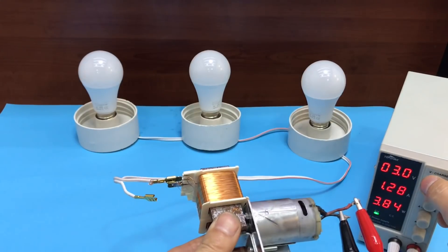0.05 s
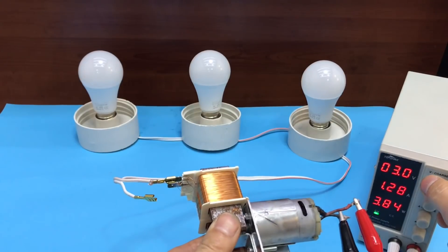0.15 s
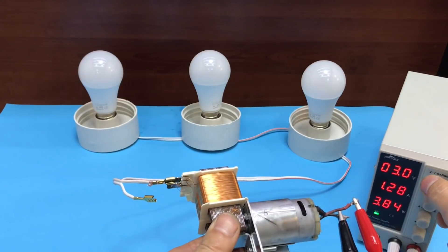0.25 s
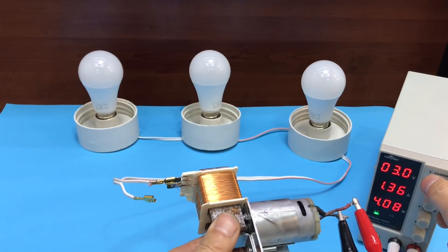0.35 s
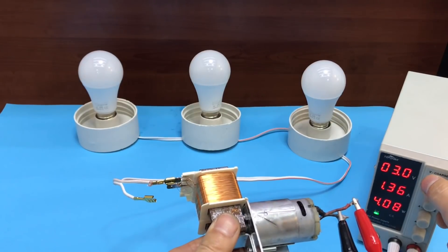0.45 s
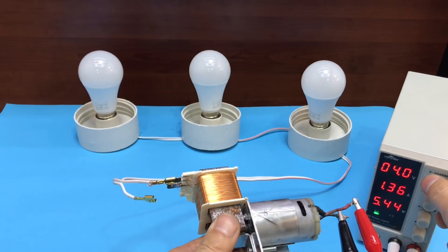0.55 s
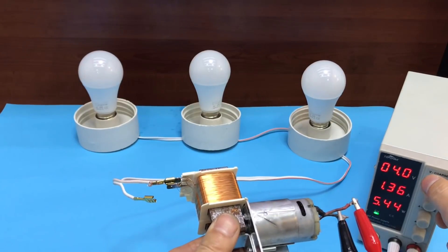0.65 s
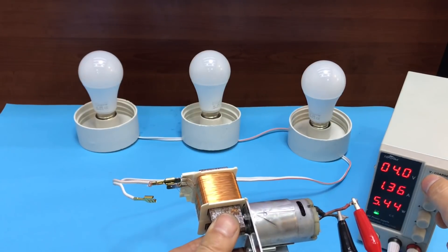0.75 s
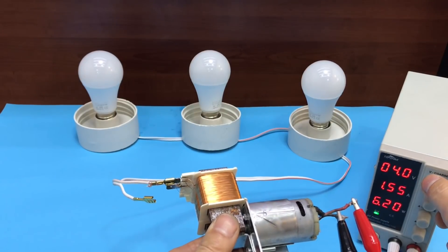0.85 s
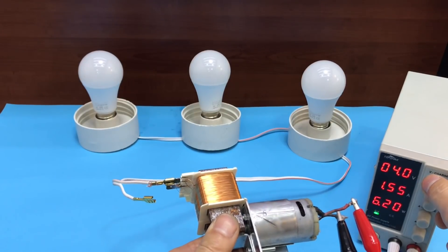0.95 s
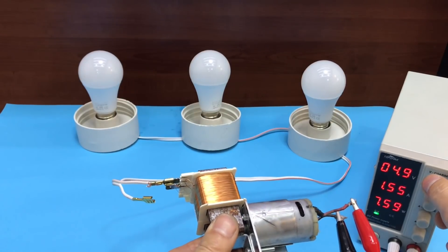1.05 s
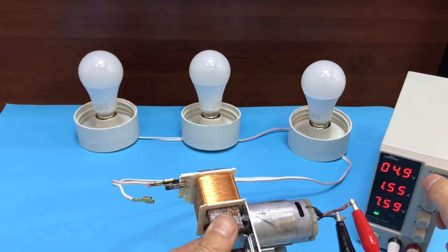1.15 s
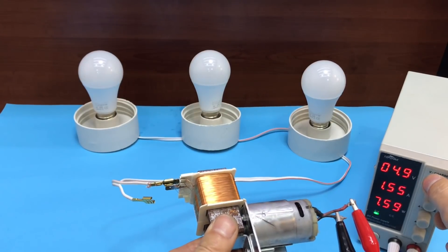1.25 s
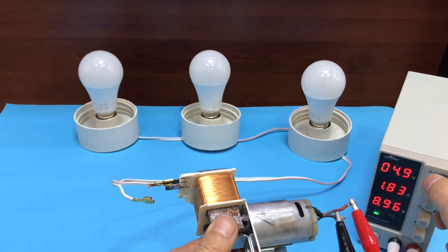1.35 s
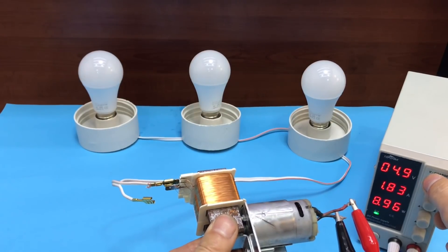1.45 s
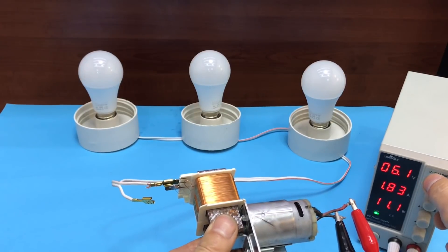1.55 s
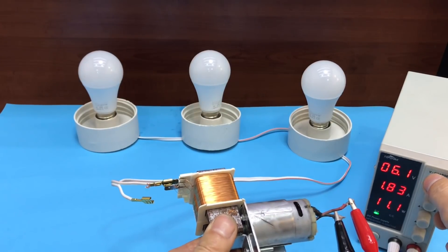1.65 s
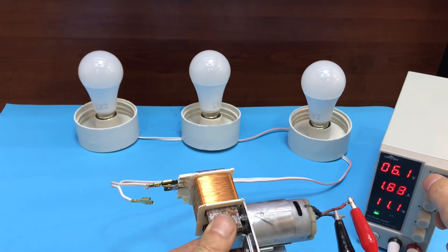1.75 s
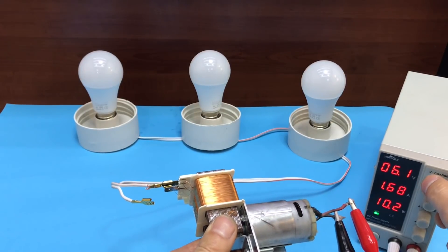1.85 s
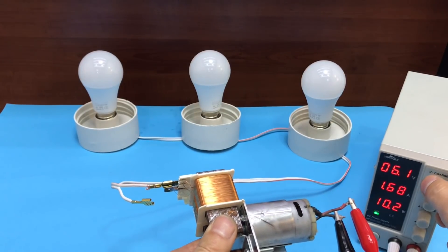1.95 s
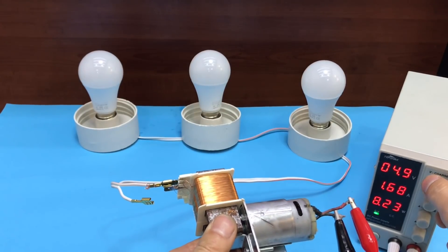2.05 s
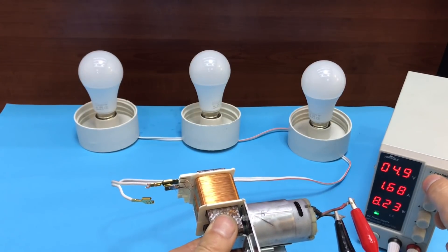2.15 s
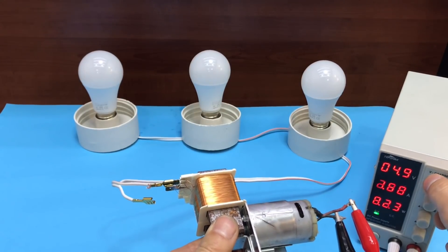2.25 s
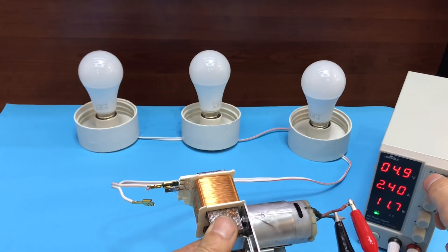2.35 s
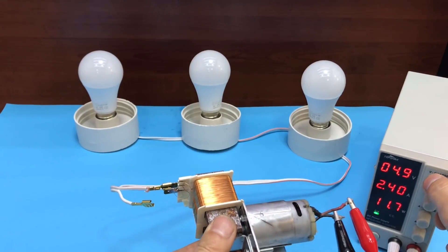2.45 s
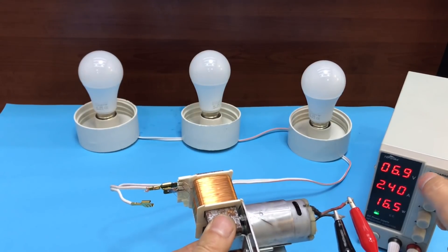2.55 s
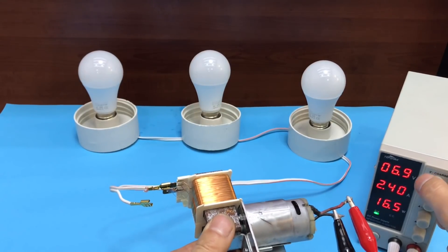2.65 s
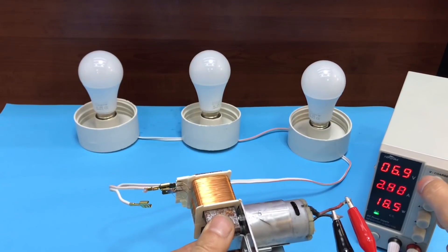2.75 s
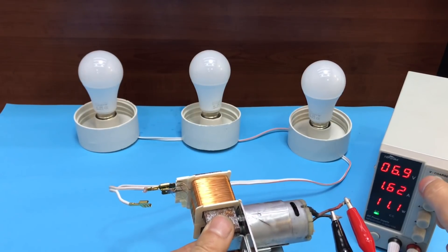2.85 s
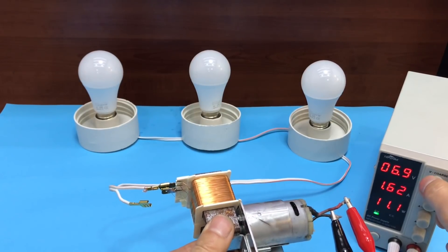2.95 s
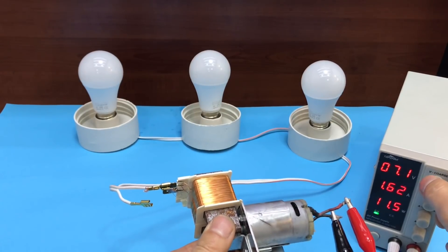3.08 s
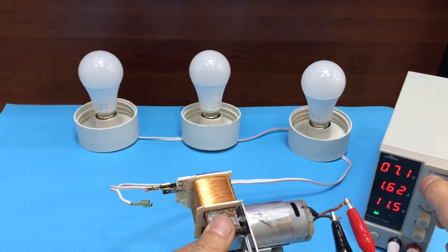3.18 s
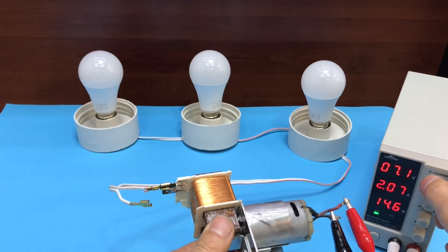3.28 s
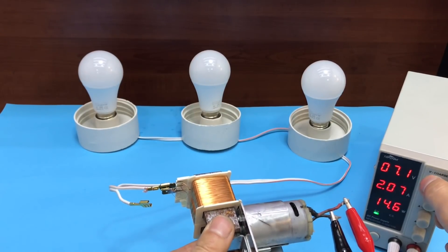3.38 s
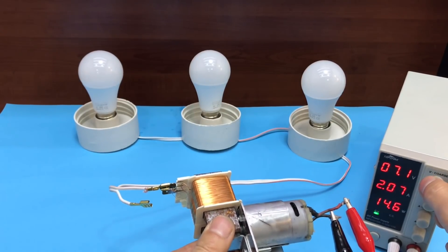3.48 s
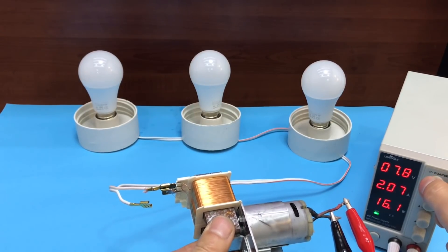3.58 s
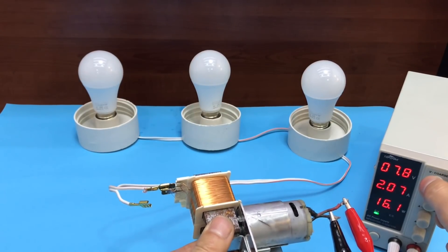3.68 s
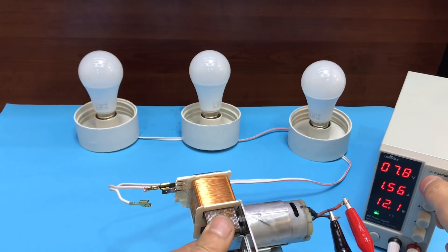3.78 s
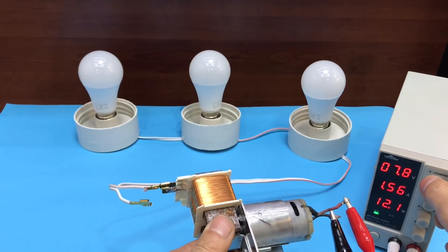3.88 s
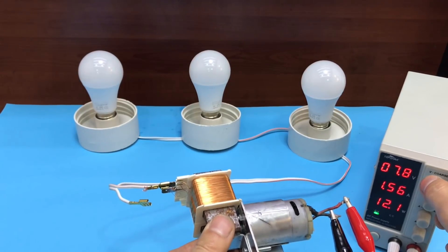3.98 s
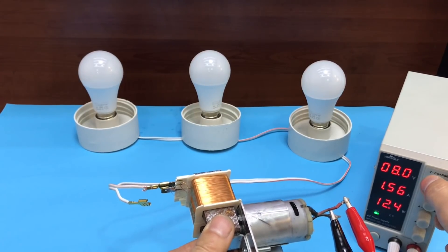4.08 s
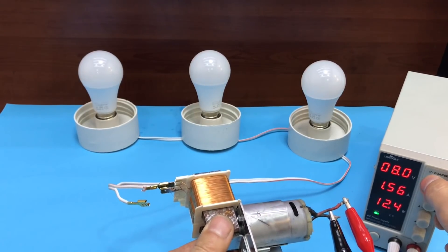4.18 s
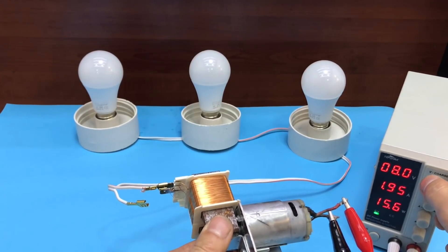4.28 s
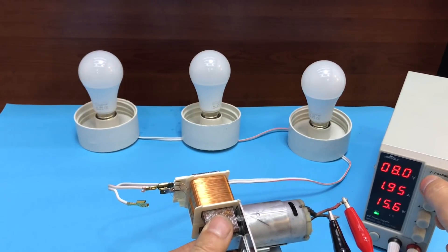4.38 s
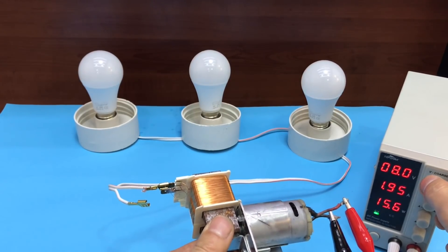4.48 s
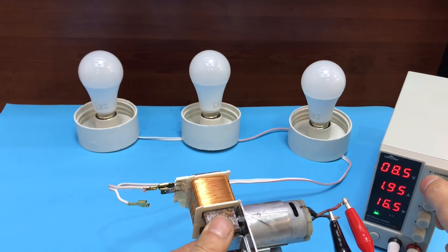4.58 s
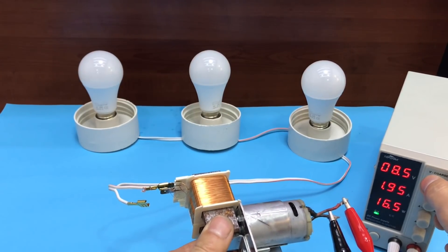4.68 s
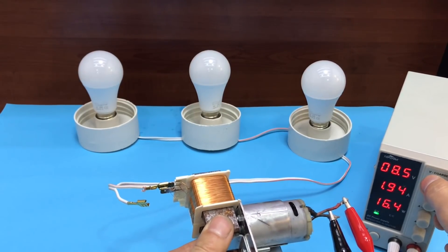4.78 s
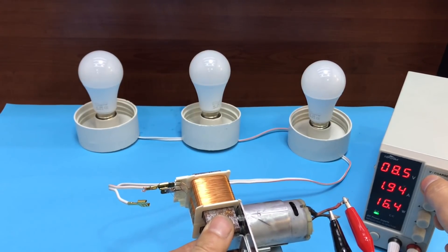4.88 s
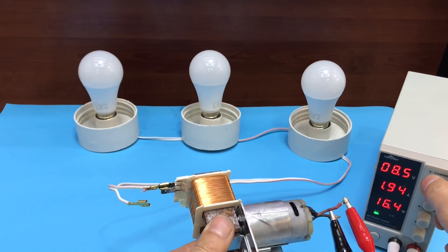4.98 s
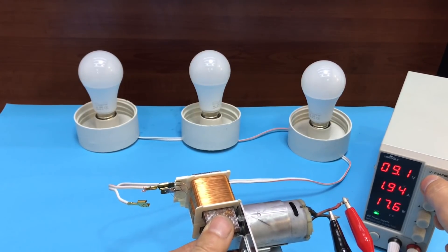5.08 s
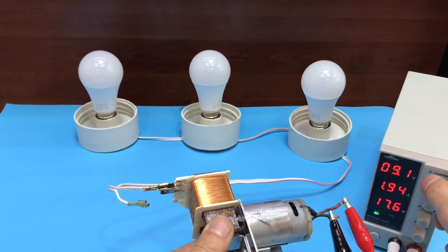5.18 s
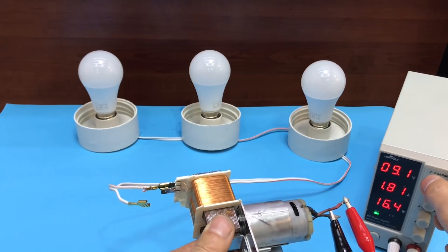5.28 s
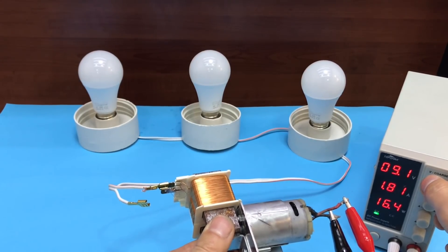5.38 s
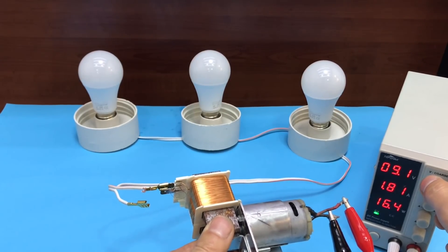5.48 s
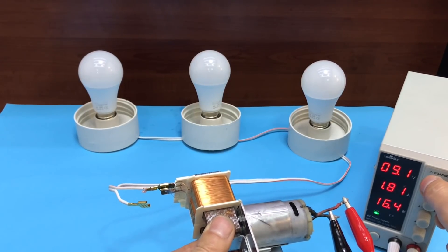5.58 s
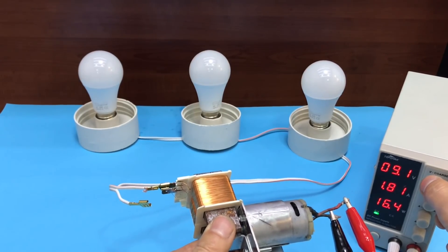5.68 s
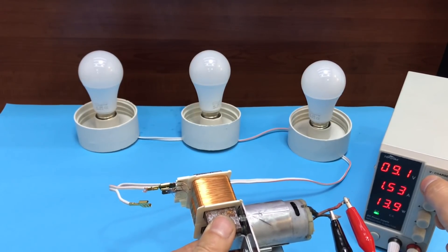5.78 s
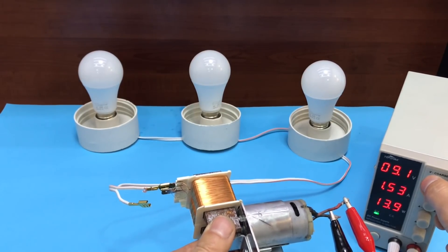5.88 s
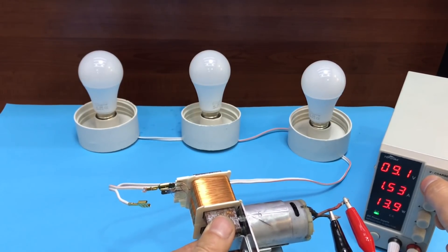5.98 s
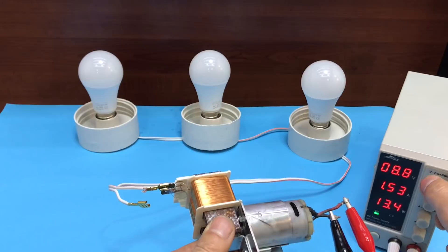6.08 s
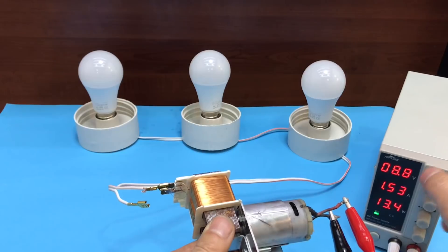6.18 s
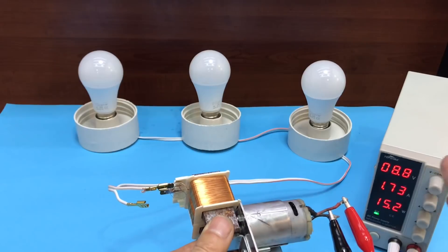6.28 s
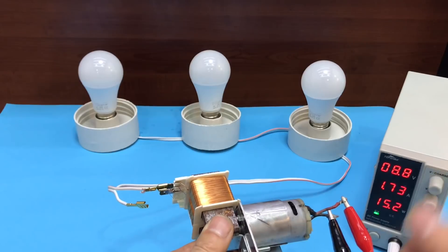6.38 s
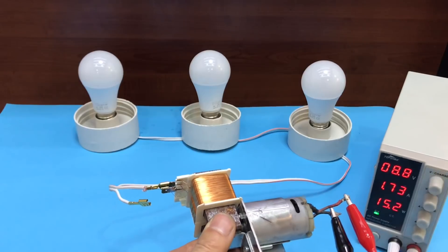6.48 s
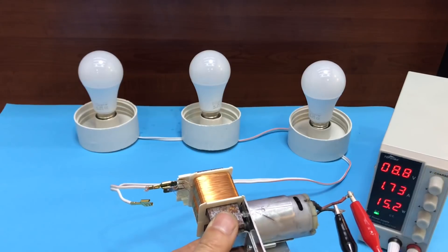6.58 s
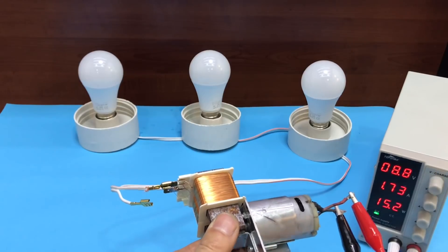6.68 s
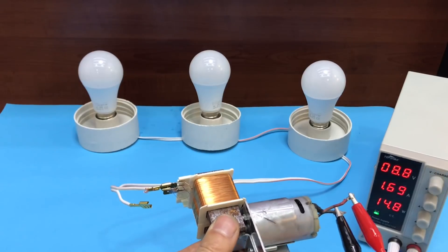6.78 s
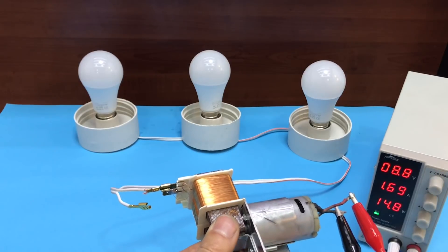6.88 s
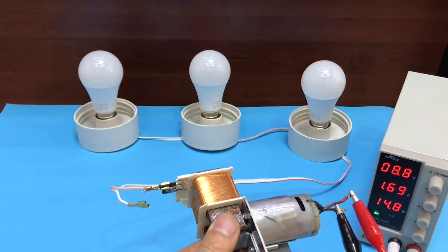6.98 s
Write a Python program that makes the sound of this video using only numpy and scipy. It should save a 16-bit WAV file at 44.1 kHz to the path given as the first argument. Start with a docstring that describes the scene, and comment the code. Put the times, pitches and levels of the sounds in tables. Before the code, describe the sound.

Light metallic rattles, a brief scrape and bursts of sharp knocking come from a spinning magnet as a small electric motor picks up speed. The motor's hissing whine rises in pitch and level, dips, recovers and levels off into a high, even whir. A thin bearing squeal joins toward the end. The sound is close, on a workbench in a quiet room.

```python
"""On a workbench in a quiet room, a small brushed DC motor spins a magnet against a hand-held coil.
Its supply is turned up in steps, so it speeds up, sagging at times under load. The brushes fizz and
the commutator (the spinning contact they press on) whines through the ringing steel can and bracket.
Early on, the magnet knocks, rattles and scrapes. The dry bearing rasps now and then, and near the end
its thin squeal joins the steady whir."""
import sys
import numpy as np
from scipy import signal
from scipy.io import wavfile
from scipy.ndimage import uniform_filter1d

SR = 44100
rng = np.random.default_rng(int(sys.argv[2]) if len(sys.argv) > 2 else 0)


def wav_record(signal):
    """Record a signal, one row per channel, as 16-bit PCM in the file named by sys.argv[1]."""
    frames = np.transpose(np.atleast_2d(signal))
    bounded = np.clip(frames, -1, 1)
    # unit amplitude maps onto the largest positive 16-bit level
    quanta = np.round(bounded * 32767).astype(np.int16)
    wavfile.write(sys.argv[1], SR, quanta)


N = 310023
T = np.arange(N) / SR
HZ = np.fft.rfftfreq(8192, 1 / SR)  # the frequencies at which filter gains are given


def amp(db):
    """Turn decibels into a plain multiplier."""
    return 10 ** (np.asarray(db) / 20)


def unit(x):
    """Scale a signal so that its average (RMS) level is 1."""
    return x / np.sqrt(np.mean(x ** 2) + 1e-20)


def steady(x, window_samples=3000):
    """Hold the level at 1 throughout, leaving fast flutter alone."""
    return x / np.sqrt(abs(uniform_filter1d(x ** 2, window_samples)) + 1e-20)


def curve(points):
    """Join (time_s, value) points with straight lines."""
    return np.interp(T, *np.transpose(points))


def spells(rows, fade_s):
    """One curve per value column of (start_s, end_s, values...) rows, fading to zero between rows."""
    return sum(np.outer(values, np.clip(np.minimum(T - start, end - T) / fade_s + .5, 0, 1))
               for start, end, *values in rows)


def drift(rate_hz):
    """A random wander of size 1 that turns about rate_hz times a second."""
    points = rng.standard_normal(4096)
    return unit(np.interp(T * rate_hz, np.arange(len(points)), points))


def spectrum(points):
    """The gain at every frequency, from (pitch_hz, gain_db) points."""
    hz, db = np.transpose(points)
    return amp(np.interp(np.log(HZ + 1), np.log(hz), db))


def colour(x, gain):
    """Filter with the given gains so that clicks ring after they land, never before."""
    log_gain = np.log(np.maximum(np.r_[gain, gain[-2:0:-1]], 1e-5))
    taps = np.fft.ifft(np.exp(np.conj(signal.hilbert(log_gain)))).real
    return signal.oaconvolve(x, taps[:len(taps) // 2])[:N]


def noise_band(hz, width_hz, steepness=2):
    """Noise in one band around a pitch."""
    gain = 1 / (1 + (2 * (HZ - hz) / width_hz) ** steepness)
    return unit(colour(rng.standard_normal(N), gain))


def once_a_turn(turns, place, length):
    """A burst at one place in each turn that dies away; place and length are parts of a turn."""
    return np.exp(-((turns - place) % 1) / length)


def speed_db(speed_hz, full_db, db_per_doubling, full_at_hz):
    """A level that rises with speed, then holds once it is full."""
    return full_db + db_per_doubling * np.log2(np.minimum(speed_hz / full_at_hz, 1))


def swept_gain(pitch_hz, peaks, steepness=1.47):
    """The strength of a tone as its pitch sweeps through resonances."""
    power = sum(amp(db) ** 2 / (1 + (2 * (pitch_hz - hz) / width) ** 2 / steepness) ** (2 * steepness)
                for hz, width, db in peaks)
    return np.sqrt(power)


def body_gain(bass_cut_hz=430):
    """The motor's body rings and lets sound out of its vents; it is too small to give much bass."""
    # ringing of the can and bracket: pitch_hz, width_hz, gain_db
    resonances = [(443, 14, -25.5), (554, 44.4, -13), (910, 56, -23.5), (1133, 77, -16.5),
                  (1220, 50, -12.5), (1580, 40, -8.5), (1890, 50, -5.5), (2127, 161, -4.5), (2575, 165, -6),
                  (2716, 67, -9), (3070, 16, -2.5), (3370, 170, -12.5), (3896, 55, 3), (3990, 670, -11),
                  (4790, 540, -11.5), (5110, 270, -7.5), (6330, 730, -9), (6980, 49, -5), (8535, 170, -8),
                  (9400, 93, -4.5), (9900, 600, -14.5), (11080, 140, -1.5), (10700, 250, -19),
                  (12038, 180, -33), (13100, 130, -35), (13750, 170, -9), (14620, 90, -1),
                  (15370, 550, -3.5)]
    # sound that leaves the vents directly: pitch_hz, gain_db
    vents = [(100, -20), (330, -40), (700, -25.5), (1400, -20), (2000, -12.5), (4500, -12.5), (5700, -15.5),
             (8000, -14), (10400, -14), (12500, -8), (16000, -12.5)]
    ringing = sum(amp(db) ** 2 / (1 + (2 * (HZ - hz) / width) ** 2) ** 1.61
                  for hz, width, db in resonances)
    return np.sqrt(ringing + spectrum(vents) ** 2) / np.sqrt(1 + (bass_cut_hz / (HZ + 1)) ** 6)


def commutator_bumps(turns, count=36):
    """Worn bumps come round each turn and slowly change: tones from 13 times the shaft speed upward."""
    buzz = np.zeros(N)
    for k in range(count):
        angle = 2 * np.pi * (13 + k) * turns
        tone = np.tanh(drift(5)) * np.cos(angle) + np.tanh(drift(5)) * np.sin(angle)
        buzz += np.sqrt(1 - k / count) * tone
    return unit(buzz)


def brush_hiss(speed_hz, full_at_hz=215):
    """A high band of hiss from the brushes that grows steeply with speed, then holds."""
    return amp(-4) * np.minimum(speed_hz / full_at_hz, 1) ** 4 * noise_band(11550, 1500, steepness=6)


def brushes(turns, speed_hz, sparks_per_s=4200, chatter_depth=0.37):
    """Rubbing, sparks and commutator bumps make the body ring, hardest once a turn."""
    # spells when the brushes ease or bite: start_s, end_s, rub_change_db, fizz_change_db
    grips = [(.93, 1.14, -2, 0), (1.25, 1.57, -1, -1.5), (1.59, 2.0, -0.5, 0), (2.0, 2.19, -3, -6.5),
             (2.19, 2.28, -2, -4), (2.82, 3.18, 1.5, 0.5), (3.19, 3.29, -1.5, -3), (3.32, 3.63, 0.9, .5),
             (3.65, 3.85, -0.3, -1.5), (3.86, 3.95, 2, 3), (3.98, 4.7, -.5, -.5), (6.55, 7.1, -1, -.3)]
    # spells when they ride smoothly, so more of the sound repeats: start_s, end_s, extra_share (0-1)
    smooth_rides = [(.58, 1.24, 0), (2.46, 3.15, 0.3)]
    rub_db, fizz_db = spells(grips, fade_s=.03) + 0.52 * drift(14)
    rub_db += speed_db(speed_hz, full_db=-40.54, db_per_doubling=10.66, full_at_hz=167.8)
    fizz_db += speed_db(speed_hz, full_db=-42.05, db_per_doubling=12.8, full_at_hz=176)
    repeat_share = 0.067 + spells(smooth_rides, fade_s=.12)[0]

    # one strong and one weak burst in every turn
    place = .02 * drift(90) + .1 * drift(3)
    bursts = once_a_turn(turns, place, 0.21) + 0.39 * once_a_turn(turns, place + 0.43, 0.33)
    bursts *= amp(2 * np.tanh(drift(170)))
    chatter = unit(1 - chatter_depth + chatter_depth * bursts / bursts.mean())

    spark_sizes = np.minimum(rng.exponential(1, N), 2) * rng.choice([-1, 1], N)
    sparks = unit(spark_sizes * (rng.random(N) < sparks_per_s / SR))
    friction = np.sqrt(0.5) * (rng.standard_normal(N) + sparks)
    bumps = 0.52 * np.sqrt(repeat_share) * commutator_bumps(turns)
    rubbing = colour(chatter * (np.sqrt(1 - repeat_share) * friction + bumps), body_gain())

    # the treble gets extra flutter and its own level
    treble = signal.sosfiltfilt(signal.butter(6, 10300, "high", fs=SR, output="sos"), rubbing)
    fizz = steady(treble * chatter ** 0.31) + chatter * brush_hiss(speed_hz)
    return amp(rub_db) * steady(rubbing - treble) + amp(fizz_db) * fizz


def shaft_drone(turns, speed_hz, waver_db=3.5):
    """Low shaft tones take turns ringing the body; the off-balance rotor hums below them."""
    # tones that shake the body: times_shaft_speed, relative_db
    shaft_tones = [(4, 3), (5, 0.5), (6, 2), (7, -2), (8, -1), (9, 1.5), (10, -7), (11, -0.5), (13, -16),
                   (14, -2), (15, -4.5), (16, -11)]
    # how well the mount and bench carry them: pitch_hz, gain_db
    mount = [(150, -19), (340, 0), (420, 10.5), (560, 2.5), (700, 1.5), (830, 0), (1000, 2), (1400, 2),
             (2000, 0), (3500, -7.5)]
    # bench resonances, shaken once a turn: pitch_hz, width_hz, level_db
    bench_peaks = [(152, 53, -78.5), (208, 28, -72)]
    angle = 2 * np.pi * turns + 0.072 * drift(40)
    tones = sum(amp(db + waver_db * drift(6)) * np.cos(round(multiple) * angle + 2 * np.pi * rng.random())
                for multiple, db in shaft_tones)
    carried = steady(colour(tones, body_gain() * spectrum(mount)), window_samples=12000)
    hum = swept_gain(speed_hz, bench_peaks) * amp(2.1 * drift(12)) * np.cos(angle)
    level_db = speed_db(speed_hz, full_db=-52.5, db_per_doubling=7.25, full_at_hz=218)
    return amp(level_db) * carried + np.sqrt(2) * hum


def commutator_whine(turns, speed_hz, waver_db=2):
    """The commutator switches twelve times a turn, making a clear tone that follows the speed."""
    # resonances the whine sweeps through: pitch_hz, width_hz, level_db
    whine_peaks = [(1220, 360, -72), (1580, 55, -61), (1936, 79.5, -52), (2078, 73, -48.5),
                   (2192, 102, -41.5), (2396, 570, -54), (2665, 850, -51.5)]
    level = swept_gain(12 * speed_hz, whine_peaks) * amp(waver_db * drift(25))
    return np.sqrt(2) * level * np.cos(12 * 2 * np.pi * turns + 0.18 * drift(60))


def mount_shake(turns, speed_hz, waver_db=0.86):
    """The mount hums as it shakes three times a turn and, weakly, twice a turn."""
    # resonances of the mount: pitch_hz, width_hz, level_db
    mount_peaks = [(288, 130, -80.5), (439, 67, -64), (504, 46, -58), (551.7, 42.2, -49.5),
                   (693, 57, -68.5)]
    angle = 2 * np.pi * turns
    level = swept_gain(3 * speed_hz, mount_peaks) * amp(waver_db * drift(17))
    return np.sqrt(2) * level * (np.cos(3 * angle) + amp(-23) * np.cos(2 * angle))


def bearing_squeal(turns, pulse_depth=0.36):
    """The dry bearing rasps and squeals in narrow bands of noise that pulse with each turn."""
    # swells of friction: start_s, loudest_s, end_s, pitch_hz, width_hz, level_db
    squeals = [(-.1, .08, .16, 7100, 600, -53), (.52, .66, .85, 4500, 900, -54),
               (.95, 1.14, 1.25, 4950, 650, -49), (4.4, 4.9, 5.2, 3900, 70, -46),
               (6.13, 6.16, 6.2, 3900, 70, -44), (6.3, 6.47, 7.3, 3300, 400, -50.5),
               (6.5, 6.62, 6.85, 3900, 70, -45), (6.65, 6.8, 6.97, 4650, 650, -48),
               (6.5, 6.8, 7.5, 6820, 600, -48.5), (6.65, 6.93, 7.4, 12150, 550, -46),
               (6.42, 6.62, 7.5, 15120, 380, -45)]
    pulse = unit(1 + pulse_depth * np.cos(2 * np.pi * turns))
    return pulse * sum(amp(db) * np.interp(T, [start, loudest, end], [0, 1, 0]) * noise_band(hz, width)
                       for start, loudest, end, hz, width, db in squeals)


def room(air_db=-71, hum_fade_s=0.065):
    """Quiet room air, the rumbling bench and faint low hums."""
    # tone colour of the air: pitch_hz, gain_db
    air_colour = [(22, -38), (35, -1.5), (55, 1.5), (80, -7), (110, -3), (200, -8.5), (330, -10.5),
                  (1000, -10.5), (16000, -37.5)]
    # a low hum that comes and goes: start_s, end_s, pitch_hz, level_db
    hum_spells = [(4.399, 5.35, 53.68, -68.5), (5.849, 6.706, 53.56, -69.5)]
    # rumble of the bench, strongest early on while the motor is slow: time_s, level_db
    rumble_levels = [(0, -64), (.4, -66.5), (.55, -72.5), (2.2, -71.5), (2.7, -83), (7.03, -82)]
    air = amp(air_db) * unit(colour(rng.standard_normal(N), spectrum(air_colour)))
    hums = np.zeros(N)
    for start, end, hz, db in hum_spells:
        fade = np.clip(np.minimum(T - start, end - T) / hum_fade_s, 0, 1)
        hums += amp(db) * np.sqrt(2) * fade * np.sin(2 * np.pi * hz * T)
    rumble = amp(curve(rumble_levels)) * noise_band(74, 46)
    constant_hum = amp(-81) * noise_band(146, 11.5)
    return air + hums + rumble + constant_hum


def bracket_ring(blows, crunch_s=0.0022):
    """Each blow rings the bracket and adds a short crunch of loose parts."""
    # notes that a blow rings: pitch_hz, ring_s (time to fall 60 dB), relative_db
    notes = [(1950, .016, -7), (2300, .016, -3), (2620, .018, 0), (5080, .016, -2), (6350, .007, -13),
             (7050, .01, -8), (10900, .007, -10), (14550, .006, -14), (15400, .005, -5)]
    t = np.arange(2048) / SR
    ring = sum(amp(db - 60 * t / ring_s) * np.sin(2 * np.pi * hz * t) for hz, ring_s, db in notes)
    ring = signal.sosfilt(signal.butter(4, 1400, "high", fs=SR, output="sos"), ring)
    crunch_level = signal.lfilter([1], [1, -np.exp(-1 / (crunch_s * SR))], blows)
    crunch = colour(crunch_level * rng.standard_normal(N), unit(body_gain()))
    return signal.oaconvolve(blows, ring / abs(ring).max())[:N] + 0.16 * crunch


def magnet_knocks(turns, speed_hz, bounce_s=.013, spread_db=1.5):
    """The slightly loose magnet knocks and bounces in step with the shaft, and rattles twice a turn."""
    # knocks, each with its run of bounces: start_s, end_s, strength_db
    bounces = [(.013, .135, -44), (.167, .19, -37), (.385, .414, -31), (.53, .556, -34), (.751, .775, -34),
               (1.411, 1.417, -28), (1.594, 1.627, -24), (1.673, 1.693, -24), (1.723, 1.73, -22),
               (1.773, 1.793, -25), (1.817, 1.886, -26), (1.913, 1.931, -23), (1.944, 2.005, -24),
               (2.268, 2.378, -23)]
    # spells of lighter rattling: start_s, end_s, strength_db
    rattles = [(0.13, 0.198, -46.5), (0.217, .375, -44), (0.392, .555, -50), (1.221, 1.997, -55),
               (2.2, 2.47, -54), (2.8, 3.1, -43)]
    # how both carry from the bracket: pitch_hz, gain_db
    knock_colour = [(1000, -4), (1500, -6), (2300, .5), (3200, -2), (5000, 2), (7000, 3), (11000, 1),
                    (15500, 1.5)]
    blows = np.zeros(N)
    for start, end, db in bounces:
        turns_apart = max(1, round(bounce_s * np.interp(start, T, speed_hz)))
        first_turn, last_turn = np.interp([start, end], T, turns)
        hits = np.searchsorted(turns, np.arange(first_turn, last_turn, turns_apart))
        blows[hits] += amp(db + spread_db * rng.standard_normal(len(hits)))

    half_turn = np.floor(2 * turns + 0.052 * drift(80))
    ticks = np.diff(half_turn, prepend=0).clip(0, 1)
    ticks *= np.where(half_turn % 2, .6, 1) * amp(-4 * np.tanh(drift(200)))  # strong, weak, and uneven
    rattle_level = spells([(start, end, amp(db)) for start, end, db in rattles], fade_s=.02)[0]
    sound = colour(bracket_ring(blows) + rattle_level * unit(bracket_ring(ticks)), spectrum(knock_colour))

    # harder bounces at speed ring brighter: taking away the previous sample thins the low notes
    hardness = np.clip(0.42 * np.log2(speed_hz / speed_hz.min()), 0, .9)
    return sound - hardness * np.roll(sound, 1)


def magnet_scrape(turns):
    """For a moment the magnet brushes the coil, with a bright scratch on every turn."""
    # how hard it scrapes: time_s, level_db
    scrape_levels = [(.49, -90), (.52, -48), (.7, -46), (.91, -43.5), (.95, -90)]
    # tone colour of the scrape: pitch_hz, gain_db
    scrape_colour = [(1000, -59), (4000, -24), (8000, -17.5), (11000, -38), (12700, -13), (14300, -14),
                     (15300, -11.5)]
    scratches = once_a_turn(turns, .45 + .01 * drift(100), .17) * rng.standard_normal(N)
    return amp(curve(scrape_levels)) * unit(colour(scratches, body_gain() * spectrum(scrape_colour)))


def scene():
    """One shaft speed drives the motor and the magnet, in a quiet room."""
    # speed of the shaft: time_s, speed_hz (turns a second)
    shaft_speeds = [(0.0, 67.4), (0.23, 75.76), (0.6, 97.6), (0.94, 113.7), (1.33, 140.5), (1.61, 150.6),
                    (1.7, 157.7), (1.84, 160), (1.9, 157.7), (1.96, 147.8), (2.08, 123.8), (2.11, 120.6),
                    (2.15, 123.9), (2.25, 142.8), (2.35, 157.7), (2.41, 164.5), (2.51, 173), (2.96, 174.2),
                    (3.11, 179), (3.39, 197.3), (3.5, 199), (3.72, 182.9), (4.23, 215.8), (4.29, 216.8),
                    (4.7, 218.3), (4.89, 230.7), (5.5, 234.9), (5.7, 219), (5.78, 218.2), (6.03, 224.8),
                    (6.68, 225.2), (7.03, 224.5)]
    speed_hz = curve(shaft_speeds)
    turns = np.cumsum(speed_hz * (1 + .0008 * drift(25))) / SR
    motor = brushes(turns, speed_hz) + shaft_drone(turns, speed_hz)
    motor += commutator_whine(turns, speed_hz) + mount_shake(turns, speed_hz) + bearing_squeal(turns)
    magnet = magnet_knocks(turns, speed_hz) + magnet_scrape(turns)
    return (motor + magnet + room())[None]


def record(dry, cutoff_hz=15830):
    """Cut away the very highest treble."""
    low_pass = signal.firwin(601, cutoff_hz, window=("kaiser", 7), fs=SR)
    return signal.oaconvolve(dry, low_pass[None], "same")


dry = scene()
out = record(dry)
wav_record(out)
```